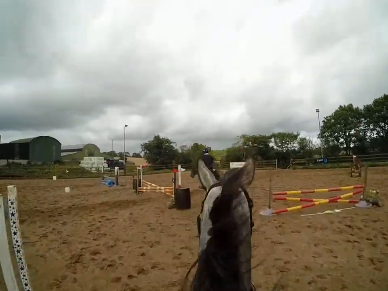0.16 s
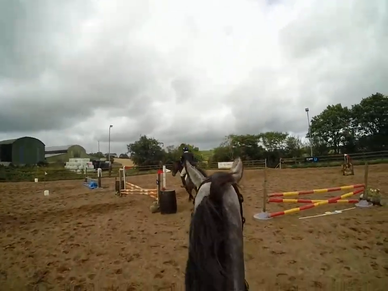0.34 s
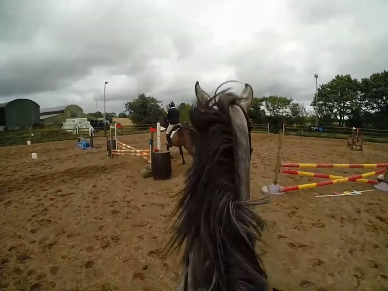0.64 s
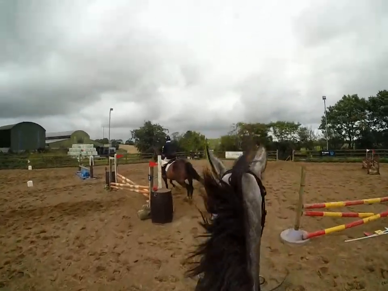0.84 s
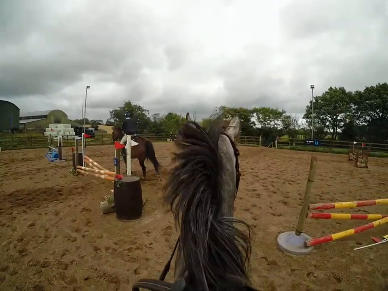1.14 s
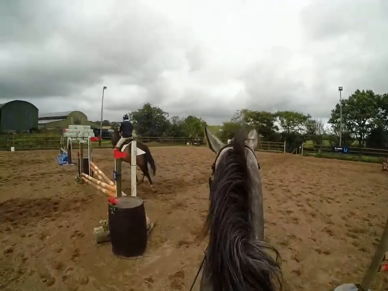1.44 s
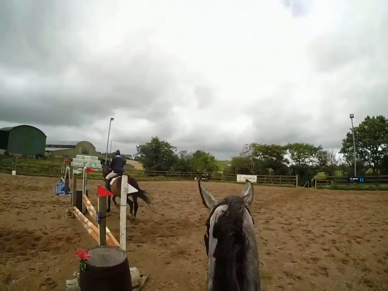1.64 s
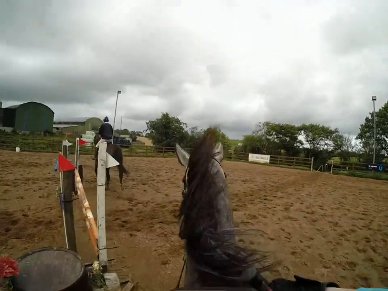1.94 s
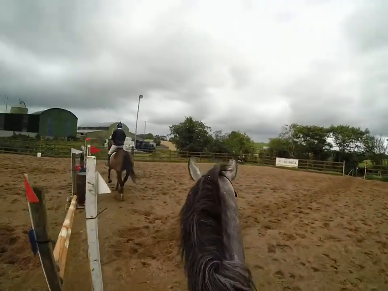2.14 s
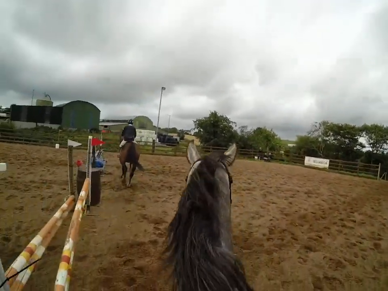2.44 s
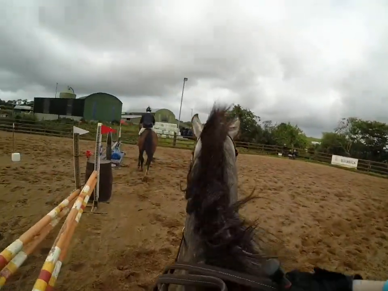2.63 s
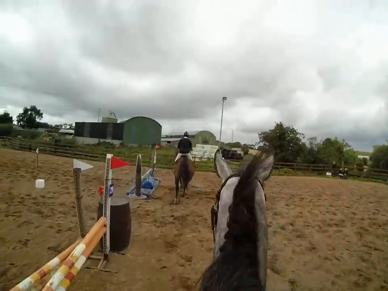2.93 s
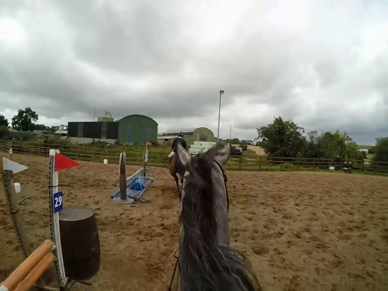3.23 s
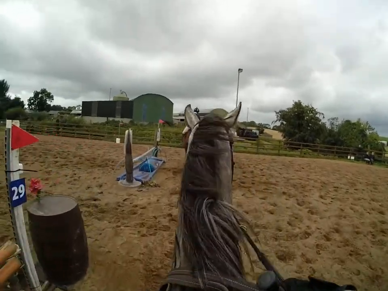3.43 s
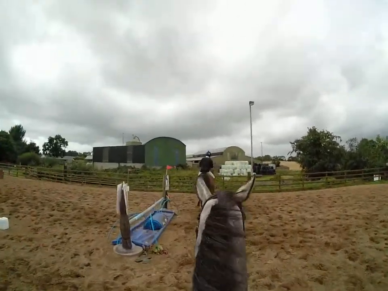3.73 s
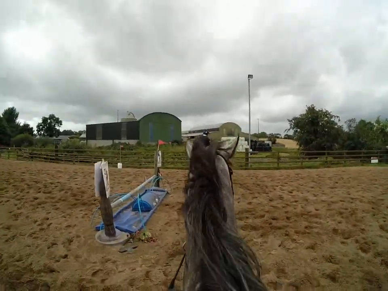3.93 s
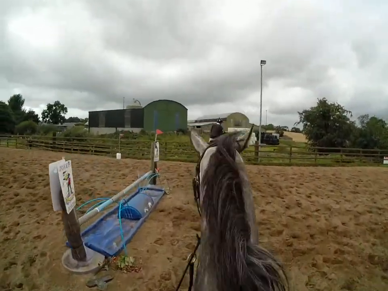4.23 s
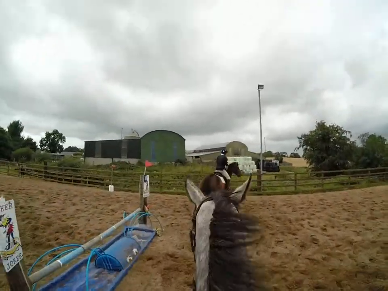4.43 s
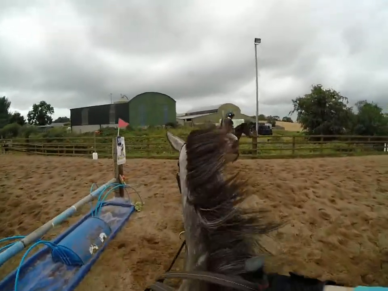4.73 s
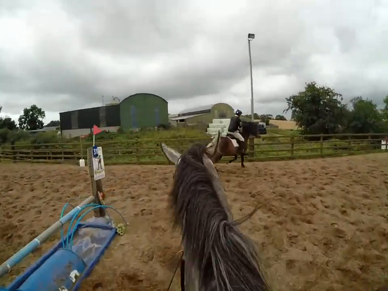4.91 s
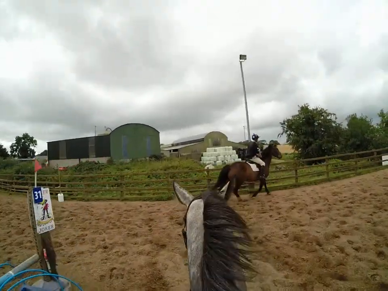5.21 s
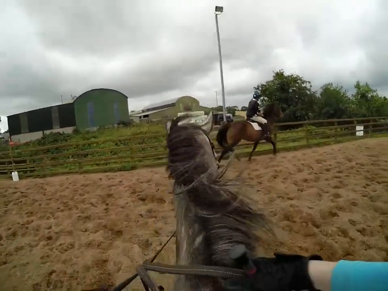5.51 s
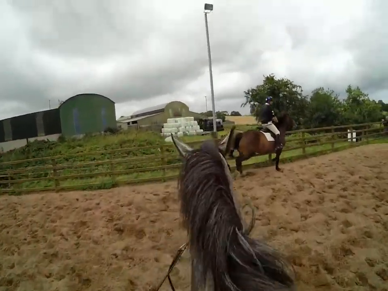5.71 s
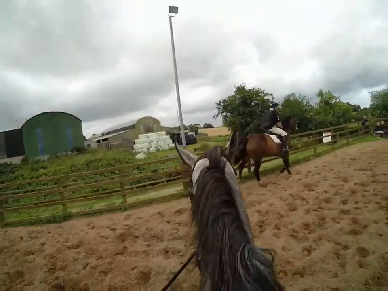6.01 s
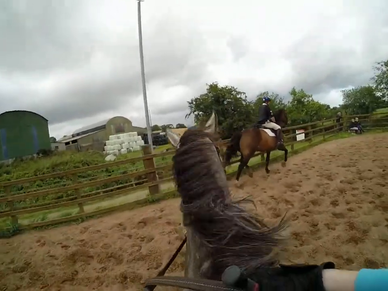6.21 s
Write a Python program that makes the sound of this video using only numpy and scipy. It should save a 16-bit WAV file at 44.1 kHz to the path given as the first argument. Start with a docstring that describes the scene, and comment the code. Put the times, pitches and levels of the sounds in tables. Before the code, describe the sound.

Heard from the saddle, a cantering horse's hooves thud and plough through sand in an even, rolling rhythm, with an occasional gritty scrape. Wind buffets the rider's microphone in low pulses with every stride. Right beside the microphone, a camera housing knocks in its mount about once a stride, alternating with the thuds. Light ticks of straps and buckles fall in between, over faint open-air hiss.

```python
"""A horse canters on a sand arena, heard from the saddle through a camera worn by its rider.
In every stride the hooves, a horse's height below, thud and plough twice through the sand, with a
gritty scrape at the bottom. Air buffets the microphone, and right beside it the camera's housing
knocks in its mount about once a stride. Straps and buckles tick in between, over a faint outdoor hiss."""
import sys
import numpy as np
from scipy import signal
from scipy.fft import rfft, irfft
from scipy.io import wavfile

SR = 44100
rng = np.random.default_rng(int(sys.argv[2]) if len(sys.argv) > 2 else 0)


def unload_audio(sound):
    """Save the sound as a 16-bit wav file, at the path given as the first command line argument."""
    columns = np.transpose(np.atleast_2d(sound))
    # keep every value between -1 and 1, then stretch to whole-number steps
    steps = np.round(np.clip(columns, -1, 1) * 32767)
    wavfile.write(sys.argv[1], SR, steps.astype(np.int16))


N = 280476
TIME = np.arange(N) / SR
HZ = np.fft.rfftfreq(4096, 1 / SR)

# spectra of open air, wind on the microphone, shifting sand and grit: (frequency [Hz], level [dB])
HISS_SPECTRUM = [(40, 11.5), (250, 10.5), (500, 7), (1000, 1), (1500, 0), (2300, -0.5), (3200, -5.5),
                 (6000, -11.5), (8000, -15.5), (12000, -17.5), (15000, -18)]
WIND_SPECTRUM = [(12, -2.5), (26, 5), (45, -2), (90, 0), (130, -6.5), (190, -14), (300, -29), (600, -74.5)]
SAND_SPECTRUM = [(90, -37.5), (180, -2), (270, 1), (320, 0.5), (400, -23), (490, -18), (610, -10.5),
                 (900, -18), (1100, -27), (1300, -57), (1800, -75.5)]
GRIT_SPECTRUM = [(900, -35.5), (1300, -10), (1700, -1), (2000, -1.5), (2300, 3.5), (2520, -2.5),
                 (2850, -7.5), (3200, -18.5), (4400, -12.5), (5400, -19.5), (6100, -18), (6800, -31),
                 (10000, -35.5), (15000, -40)]
# resonances of the housing's hollow body and of its walls: (frequency [Hz], width [Hz], level [dB])
BODY_MODES = [(268.4, 119, 6.5), (441.5, 214, 2.5), (641, 200, 1.5), (750, 20, -6), (1092, 161, -8)]
WALL_MODES = [(1455, 110, -10), (1738, 370, -7.5), (2178, 360, -2.5), (2800, 213, -7.5), (4130, 400, -23.5),
              (4560, 460, -18), (5300, 420, -23), (6040, 370, -24), (7670, 820, -36), (9100, 700, -45.5)]
# the clearer ticks of tack and mount: (time [s], level [dB], body balance [dB])
TACK_TICKS = [(0.144, -37, 2), (0.164, -33.5, -0.5), (0.218, -40, 12), (0.255, -36, 0), (0.347, -26, 4.5),
              (0.456, -43, 9), (0.814, -38.5, 6), (0.883, -38, 15.5), (0.917, -41.5, 11), (0.95, -37, 3),
              (1.148, -40.5, 10), (1.311, -49, 17), (1.67, -39, 9.5), (1.976, -54, 25.5), (2.923, -32, 4),
              (3.08, -32.5, 5), (3.174, -36, 14), (3.297, -34.5, 5.5), (3.317, -26, 7), (3.607, -45.5, 16),
              (3.731, -35, -3), (3.862, -39.5, 6.5), (3.886, -52, 26), (4.383, -59, 27), (4.457, -53, 23),
              (4.647, -40, 3.5), (4.792, -30.5, 4.5), (5.038, -36.5, -3), (5.05, -35, 8), (5.41, -36.5, 1),
              (5.515, -25, -1), (5.727, -39, 12.5), (5.758, -37, 6), (5.947, -28, 0.5),
              (5.979, -38.5, 17.5), (6.193, -29.5, 6.5)]
# the housing knocks in its mount: (time [s], level [dB], body balance [dB], treble balance [dB],
# wall pitch [Hz], body pitch [Hz], rattle level [dB])
MOUNT_KNOCKS = [(0.3239, -20.5, -5, -17.5, 1930, 1100, -44), (1.0126, -13.5, -7.5, -27, 2270, 560, -32.5),
                (1.2238, -23, -4.5, -36, 1700, 650, -62), (1.708, -14.5, -7.5, -29, 2170, 715, -38),
                (2.388, -13.5, -10, -31, 2340, 434, -39), (3.1069, -10.5, -12, -30, 2400, 703, -29.5),
                (3.7754, -16, -6, -31.5, 1680, 612, -38.5), (4.4985, -13.5, -7.5, -26.5, 2070, 584, -29),
                (5.222, -13.5, -7.5, -26.5, 2150, 613, -31)]
# round every knock the loose mount touches twice and rebounds once:
# (time after the knock [s], level relative to its rattle [dB], body balance [dB])
MOUNT_RATTLE = [(-.033, -5.5, 6.5), (-.014, 2, 1.5), (.026, -4, 6.5)]
# each stride bottoms out: (time [s], gust level [dB], scrape level [dB], scrape half length [s])
STRIDE_BOTTOMS = [(0.027, -22, -75, 0.016), (0.636, -21, -54, 0.033), (1.351, -23.5, -48.5, 0.026),
                  (2.066, -23, -25.5, .011), (2.759, -21.5, -40, 0.011), (3.439, -25, -48, 0.019),
                  (4.119, -23.5, -49, 0.017), (4.861, -21, -52.5, 0.016), (5.587, -23, -39, 0.011),
                  (6.325, -23.5, -48.5, 0.0085)]
# hooves plough the sand before and after the bottom of each stride, with lighter scuffs between:
# (middle time [s], rush level [dB], spray level [dB], half length [s])
HOOF_PLOUGHS = [(0.073, -36.5, -55.5, 0.029), (0.14, -46, -61.5, 0.042), (0.54, -45.5, -62.5, 0.05),
                (0.627, -35.5, -61, 0.044), (0.763, -37.5, -57, 0.043), (1.326, -31.5, -52.5, 0.018),
                (1.469, -35.5, -56.5, 0.038), (2.038, -31, -52, 0.012), (2.16, -34.5, -52.5, .034),
                (2.488, -47.5, -59.5, 0.039), (2.724, -29.5, -52, 0.019), (2.851, -35, -56, 0.023),
                (3.424, -37.5, -56.5, 0.032), (3.559, -43, -56, 0.029), (4.095, -37.5, -56, 0.025),
                (4.262, -35, -55.5, 0.048), (4.824, -34.5, -53.5, 0.019), (4.971, -34, -57, 0.03),
                (5.54, -29.5, -54, .028), (5.678, -37.5, -60, 0.052), (5.932, -35.5, -59, 0.032),
                (6.292, -32, -51.5, 0.017)]
# footfalls that come up through horse and rider: (time [s], level [dB], pitch [Hz])
HOOF_THUDS = [(0.088, -19.5, 71.6), (0.167, -21, 37.3), (0.671, -16, 35.4), (0.893, -23.5, 77.6),
              (1.197, -29, 134), (1.374, -10.5, 47.2), (1.616, -19.5, 74), (1.979, -18, 174),
              (2.058, -7, 57), (2.084, -9, 87), (2.76, -10.5, 50), (3.047, -21.5, 50), (3.463, -14, 53),
              (3.889, -23, 136), (4.15, -15.5, 50.6), (4.382, -25.5, 133), (4.464, -24, 86.5),
              (4.871, -15.5, 40.3), (5.189, -18.5, 61.3), (5.591, -7.5, 46), (5.905, -21.5, 134),
              (5.959, -21.5, 86), (6.336, -20.5, 47.5)]


def amp(db):
    """Decibels to gain."""
    return 10 ** (np.asarray(db) / 20)


def unit(x):
    """Scales to rms 1."""
    return x / np.sqrt(np.mean(x ** 2) + 1e-20)


def add(mix, s, sound):
    """Adds a sound into the mix from time s on."""
    part = mix[max(round(s * SR), 0):][:len(sound)]
    part += sound[:len(part)]


def gain_at(frequencies, spectrum):
    """Reads a spectrum's gain along a logarithmic frequency axis."""
    hz, db = np.transpose(spectrum)
    return amp(np.interp(np.log(frequencies + 1), np.log(hz), db))


def colour(x, spectrum):
    """Gives a signal a spectrum, at rms 1."""
    gain = gain_at(np.fft.rfftfreq(len(x), 1 / SR), spectrum)
    return unit(irfft(rfft(x) * gain, len(x)))


def causal(gain):
    """The sharp-fronted impulse response whose spectrum has this shape over HZ."""
    log_gain = np.log(np.maximum(gain / gain.max(), 1e-5))
    mirrored = np.r_[log_gain, log_gain[-2:0:-1]]
    return np.fft.ifft(np.exp(signal.hilbert(mirrored).conj())).real


def grains(per_s, spread_db):
    """Random clicks of uneven size, at rms 1."""
    size = amp(spread_db * np.minimum(rng.exponential(1, N), 4))
    return unit(rng.standard_normal(N) * size * (rng.random(N) < per_s / SR))


def steady(x, seconds):
    """Evens out level swings slower than the given time."""
    width = int(seconds * SR)
    power = signal.oaconvolve(x ** 2, signal.windows.hann(width) * 2 / width, "same")
    return x / np.sqrt(power.clip(1e-6))


def wander(depth_db, per_s):
    """A gain that drifts at random."""
    knots_db = depth_db * np.clip(rng.standard_normal(1000), -2, 2)
    return amp(np.interp(TIME * per_s, np.arange(len(knots_db)), knots_db))


def surge(s, rise_db_per_s, fall_db_per_s):
    """A gain that climbs to 1 at time s and dies away again."""
    return amp(-np.maximum((s - TIME) * rise_db_per_s, (TIME - s) * fall_db_per_s))


def together(gains):
    """Adds the gains of unrelated noises by their power."""
    return np.sqrt(sum(gain ** 2 for gain in gains))


def arena_hiss():
    """The faint, even hiss of the open air round the arena."""
    return amp(-56.5) * colour(rng.standard_normal(N), HISS_SPECTRUM)


def wind_on_microphone(swing, lull):
    """Lumpy low pressure on the microphone, strongest as the rider drops to the bottom of each stride."""
    lumps = steady(colour(rng.standard_normal(N), WIND_SPECTRUM), seconds=0.06)
    gusts = [amp(db) * surge(s, rise_db_per_s=140.5, fall_db_per_s=103.5)
             for s, db, *_ in STRIDE_BOTTOMS]
    return together([*gusts, amp(-30.5) * swing, amp(-43.5) * lull]) * lumps


def housing_ring(modes, favoured_hz, treble_db=0):
    """The housing's answer to one click; the point of contact favours one pitch and sets the treble."""
    hz, width, db = np.transpose(modes)[:, :, None]
    scatter_db = 1.5 * rng.standard_normal(hz.shape)
    gains = amp(db + scatter_db + treble_db * (hz > 3500)) / (1 + (2 * (HZ - hz) / width) ** 2)
    favour = amp(5.9 * np.exp(-((HZ / favoured_hz - 1) / 0.073) ** 2))
    ring = causal(together(gains) * favour)
    return ring / abs(ring).max()


def chatter(x, share, seconds):
    """Tiny rebounds smear a contact over a few milliseconds."""
    t = np.arange(len(x)) / SR
    rebounds = rng.standard_normal(len(x)) * np.exp(-t / seconds)
    rebounds *= share / np.linalg.norm(rebounds)
    rebounds[0] = 1
    return signal.fftconvolve(x, rebounds)[:len(x)]


def tack_ticks(stray_per_s=7):
    """Small, close contacts ring the housing: single ticks, the rattle round each knock, faint strays."""
    out = np.zeros(N)
    rattles = [(s + lag, rattle_db + db, body_db)
               for s, *_, rattle_db in MOUNT_KNOCKS for lag, db, body_db in MOUNT_RATTLE]
    strays = [((slot + place) / stray_per_s, -48.5 + 5 * rng.standard_normal(), 3)
              for slot, place in enumerate(rng.random(size=46))]
    for s, db, body_db in [*TACK_TICKS, *rattles, *strays]:
        walls = housing_ring(WALL_MODES, rng.uniform(1510, 2520), treble_db=-5.5)
        body = housing_ring(BODY_MODES, rng.uniform(600, 1156))
        add(out, s - 0.0005, amp(db - 0.5) * chatter(walls, share=0.6, seconds=0.004))
        add(out, s - 0.0005, amp(db + body_db - 4) * chatter(body, share=0.6, seconds=0.004))
    return out


def housing_knocks():
    """Right at the microphone: a first touch, the hard contact, the hollow body, then a low sway."""
    out, t = np.zeros(N), np.arange(SR // 12) / SR
    sway = np.sin(2 * np.pi * 68 * t) * np.exp(-t / 0.011)  # the camera on its strap
    for s, db, body_db, treble_db, wall_hz, body_hz, _ in MOUNT_KNOCKS:
        walls = housing_ring(WALL_MODES, wall_hz, treble_db + 26.5)
        add(out, s - 0.0012, amp(db - 18) * chatter(walls, share=1.0, seconds=0.0017))
        add(out, s + 0.0006, amp(db) * chatter(walls, share=0.47, seconds=0.0059))
        add(out, s + 0.00149, -amp(db + body_db + 9) * housing_ring(BODY_MODES, body_hz))
        add(out, s + 0.0053, amp(-5.5 + 0.58 * db) * sway)
    return out


def grit_scrapes():
    """Short dense bursts of grit underfoot as each stride bottoms out."""
    level = sum(amp(db) * np.exp(-((TIME - s) / half) ** 2) for s, _, db, half in STRIDE_BOTTOMS)
    grit = steady(colour(grains(per_s=6000, spread_db=1.5), GRIT_SPECTRUM), seconds=0.02)
    sand = steady(colour(rng.standard_normal(N), SAND_SPECTRUM), seconds=0.09)
    return level * (grit + amp(3.5) * sand)


def clod_patter(per_s, unevenness):
    """Clods of sand: dull pulses in quick uneven succession, over a wash of smaller ones."""
    gaps = np.exp(unevenness * rng.standard_normal(4000)) / per_s
    onsets = (np.cumsum(gaps) * SR).astype(int)
    clicks = np.zeros(N)
    clicks[onsets[onsets < N]] = 1
    clicks *= amp(1.8 * np.clip(rng.standard_normal(N), -2, 2))
    drive = unit(clicks - clicks.mean()) + 0.58 * grains(per_s=2500, spread_db=3)
    return unit(signal.oaconvolve(drive, causal(gain_at(HZ, SAND_SPECTRUM)))[:N])


def hoof_push(s, half, attack_s=0.01, release_s=0.014):
    """The gain of one hoof's push through the sand: attack, hold, release."""
    half_hold = 0.79 * half
    early = np.maximum(s - half_hold - TIME, 0)
    late = np.maximum(TIME - s - half_hold, 0)
    return np.exp(-early / attack_s - late / release_s)


def hoof_ploughs(swing, lull):
    """Hooves plough the sand below: a fluttering rush of clods and a spray of grains and crumbs."""
    clods = steady(clod_patter(per_s=130, unevenness=0.4), seconds=0.19)
    crumbs = grains(per_s=160, spread_db=2.5)
    fine_grains = grains(per_s=2700, spread_db=-1.5)
    spray = steady(colour(fine_grains + 0.47 * crumbs, GRIT_SPECTRUM), seconds=0.02)
    rush_gains = [amp(-55.5) * lull, amp(-43.5) * swing]
    spray_gains = [amp(-71.5) * lull, amp(-61) * swing]
    for s, rush_db, spray_db, half in HOOF_PLOUGHS:
        push = hoof_push(s, half)
        rush_gains.append(amp(rush_db) * push)
        spray_gains.append(amp(spray_db) * push)
    crunch = wander(depth_db=3.07, per_s=70)  # the sand gives way unevenly
    return crunch * (together(rush_gains) * clods + together(spray_gains) * spray)


def hoof_thuds():
    """Sand does not ring: each footfall reaches the microphone as one soft push inside a longer dip."""
    out = np.zeros(N)
    push, dip = 0.3, 0.7  # half lengths, in cycles of the thud's pitch
    for s, db, hz in HOOF_THUDS:
        near = abs(TIME - s) < 2 / hz
        cycles = (TIME[near] - s) * hz
        pulse = np.exp(-(cycles / push) ** 2) - push / dip * np.exp(-(cycles / dip) ** 2)
        out[near] += amp(db + 5) * pulse
    return out


def scene():
    """Hooves, tack and air as they meet at the rider's microphone, in mono."""
    # the rider's swing into each knock stirs sand and air, which then settle
    swings = [surge(s - 0.014, rise_db_per_s=213, fall_db_per_s=81.5) for s, *_ in MOUNT_KNOCKS]
    swing = np.max(swings, axis=0)
    lull = wander(depth_db=6, per_s=25)  # the low stir heard between footfalls
    hiss = arena_hiss()
    hooves = hoof_thuds() + hoof_ploughs(swing, lull) + grit_scrapes()
    return (hooves + housing_knocks() + tack_ticks() + wind_on_microphone(swing, lull) + hiss)[None]


def record(dry):
    """The microphone sits in a closed housing that muffles the top octave; the band ends at 15.1 kHz."""
    muffled = signal.sosfilt(signal.butter(2, 9500, fs=SR, output="sos"), dry)
    band_limit = signal.firwin(511, 15100, window=("kaiser", 9), fs=SR)
    return signal.oaconvolve(muffled, band_limit[None], "same")


dry = scene()
out = record(dry)
unload_audio(out)
```